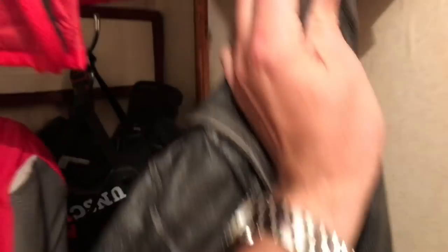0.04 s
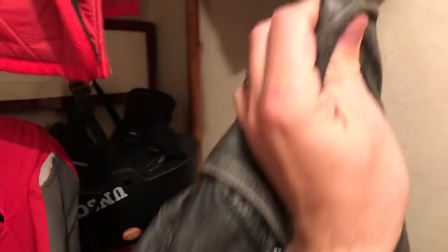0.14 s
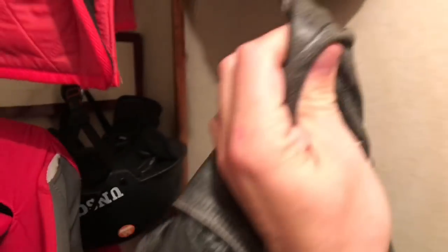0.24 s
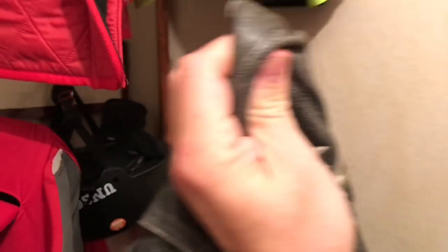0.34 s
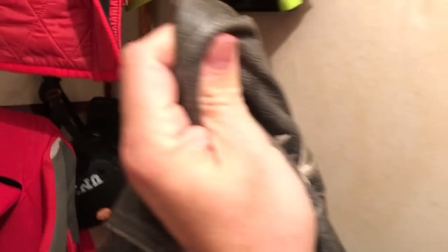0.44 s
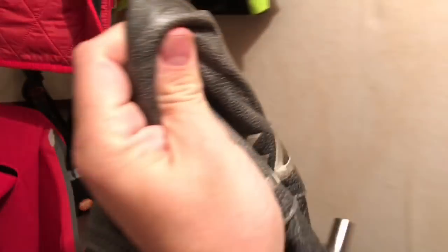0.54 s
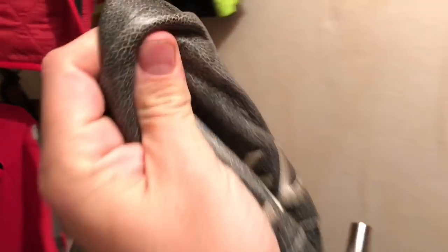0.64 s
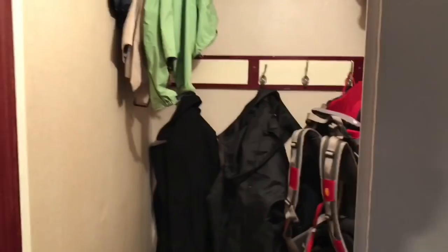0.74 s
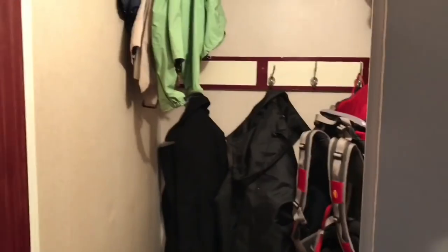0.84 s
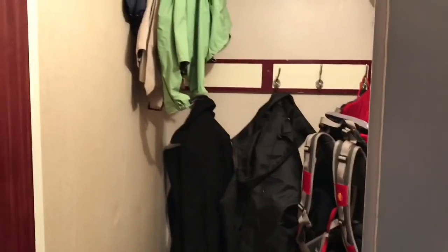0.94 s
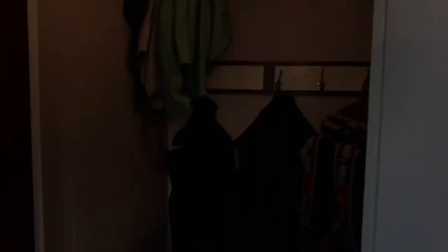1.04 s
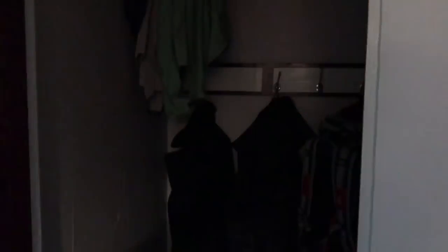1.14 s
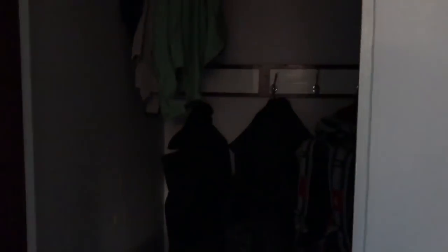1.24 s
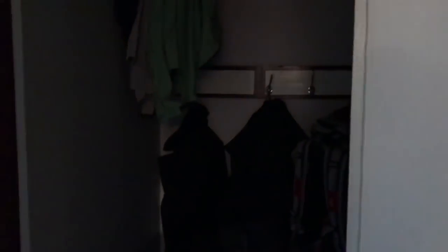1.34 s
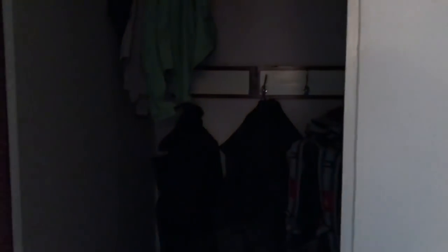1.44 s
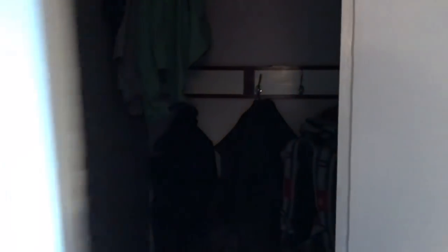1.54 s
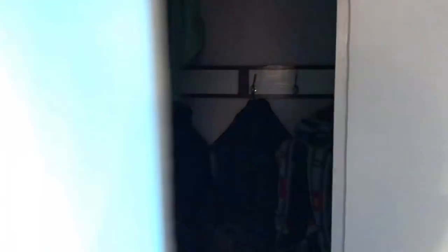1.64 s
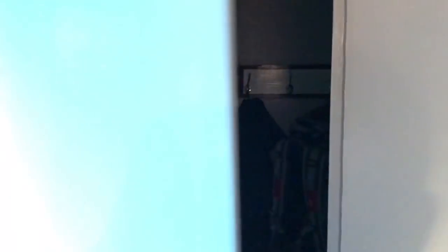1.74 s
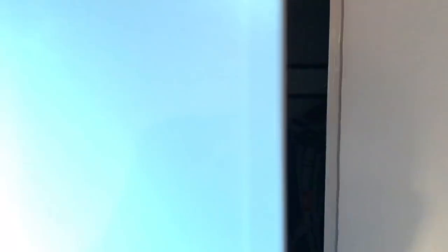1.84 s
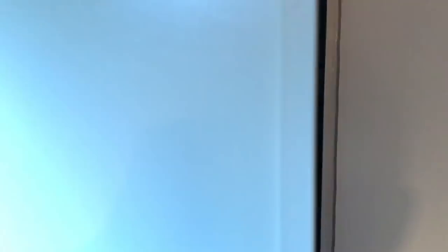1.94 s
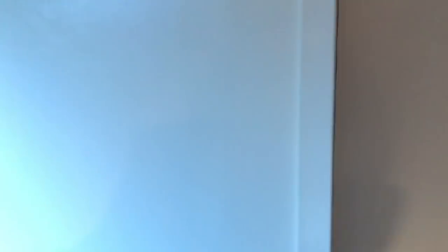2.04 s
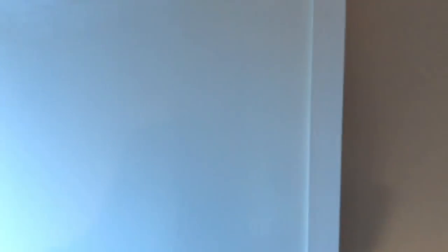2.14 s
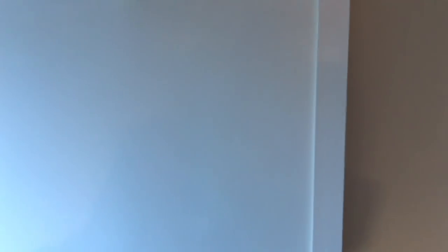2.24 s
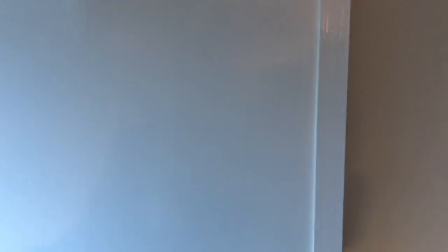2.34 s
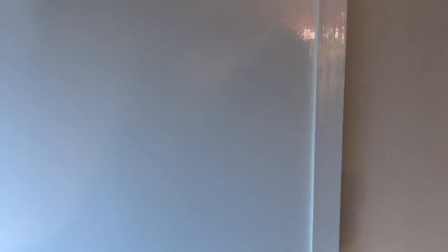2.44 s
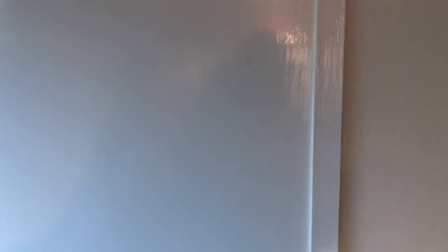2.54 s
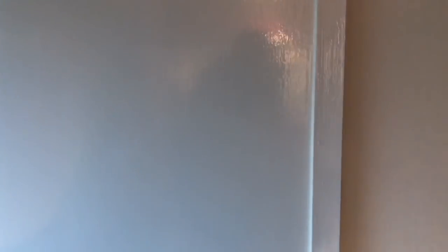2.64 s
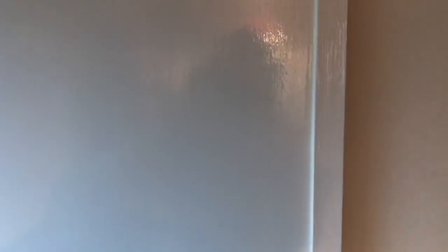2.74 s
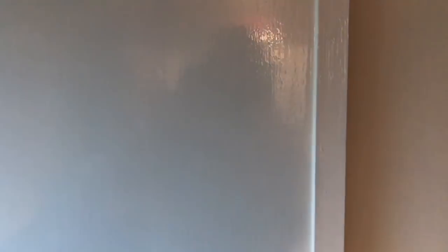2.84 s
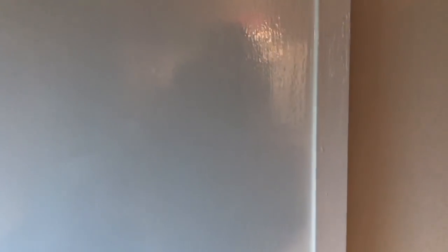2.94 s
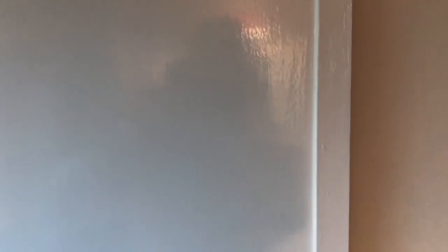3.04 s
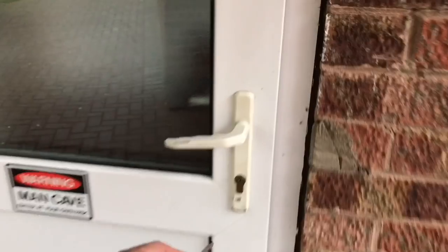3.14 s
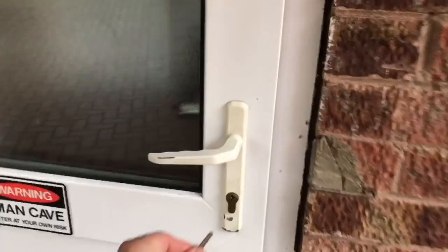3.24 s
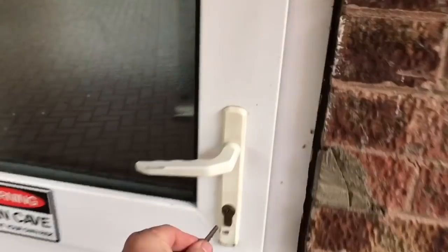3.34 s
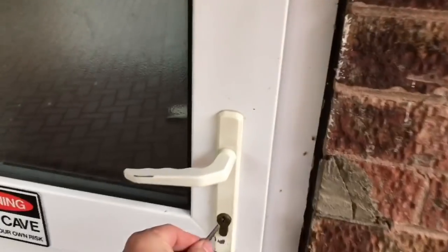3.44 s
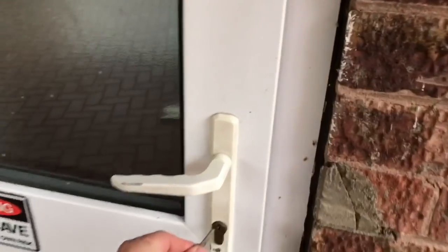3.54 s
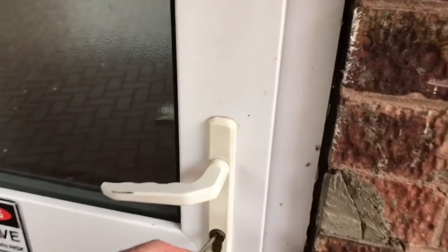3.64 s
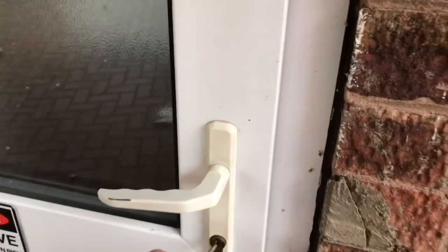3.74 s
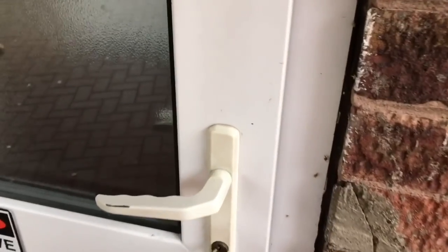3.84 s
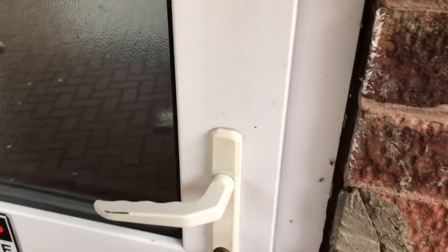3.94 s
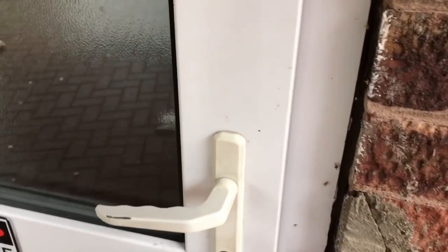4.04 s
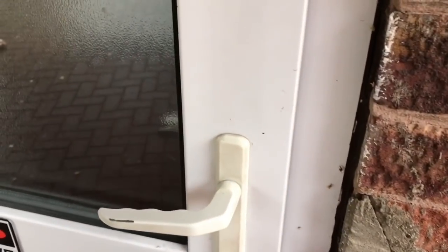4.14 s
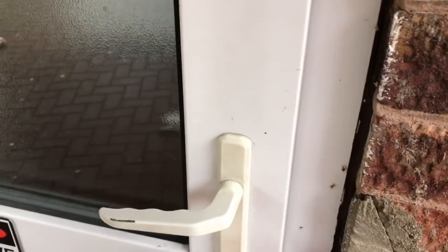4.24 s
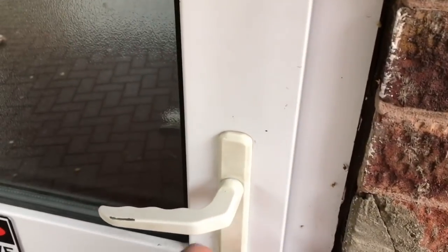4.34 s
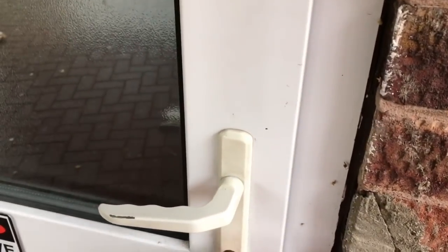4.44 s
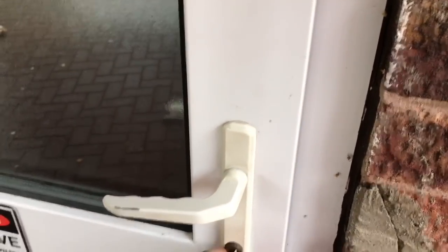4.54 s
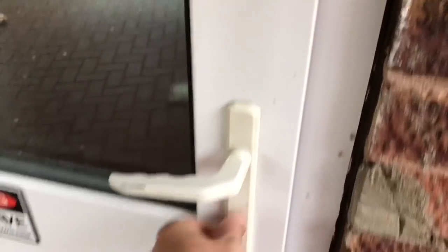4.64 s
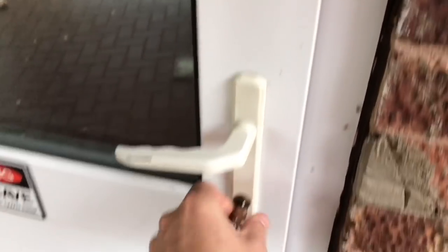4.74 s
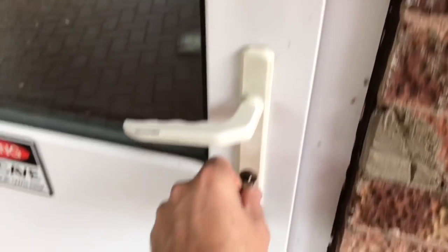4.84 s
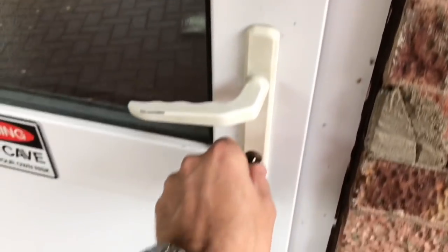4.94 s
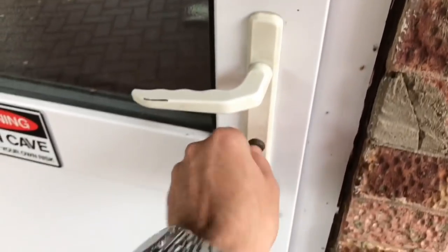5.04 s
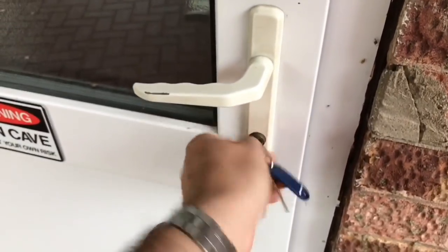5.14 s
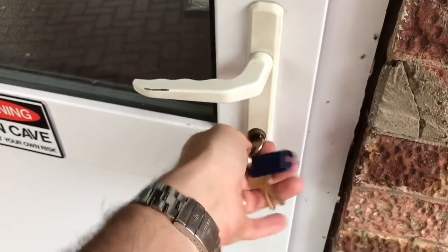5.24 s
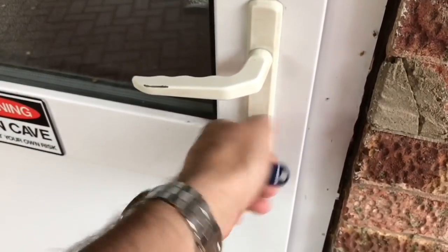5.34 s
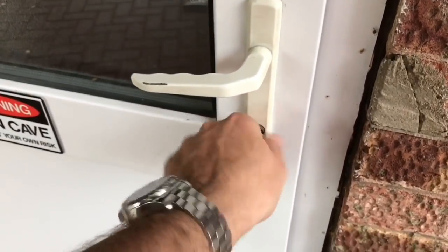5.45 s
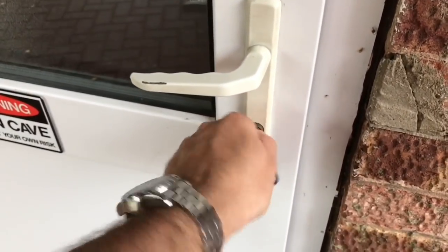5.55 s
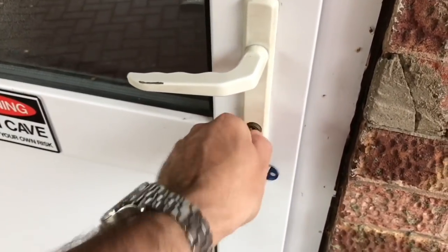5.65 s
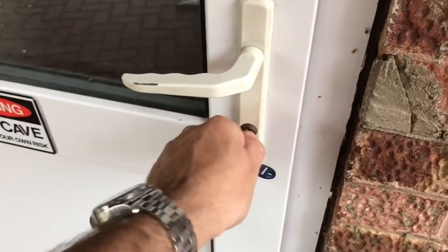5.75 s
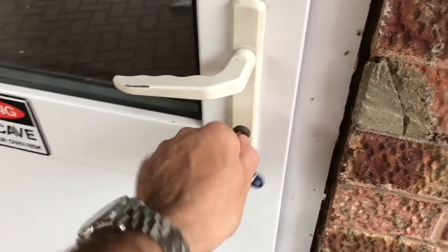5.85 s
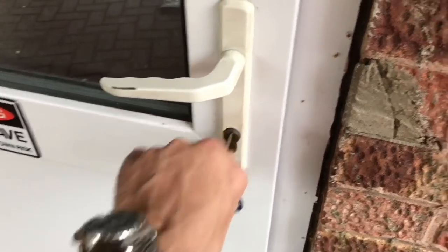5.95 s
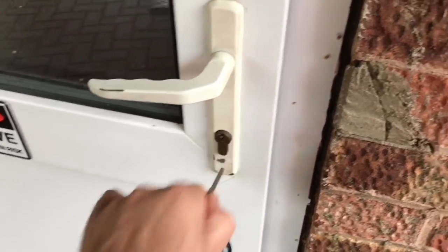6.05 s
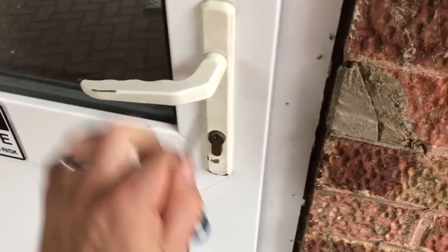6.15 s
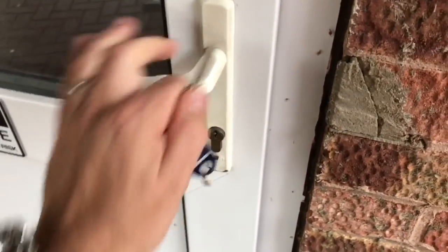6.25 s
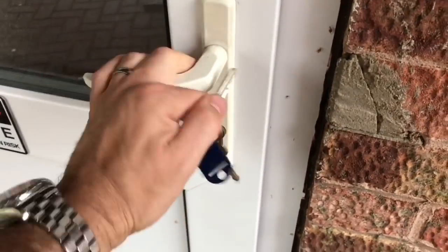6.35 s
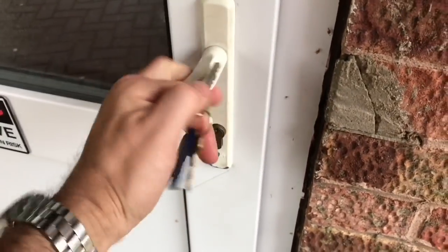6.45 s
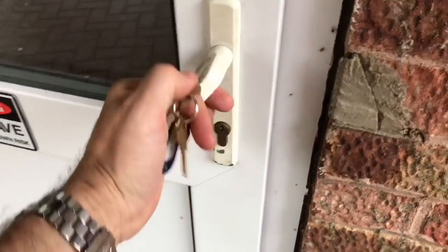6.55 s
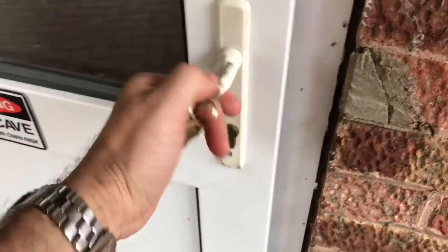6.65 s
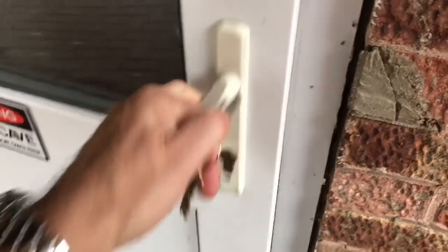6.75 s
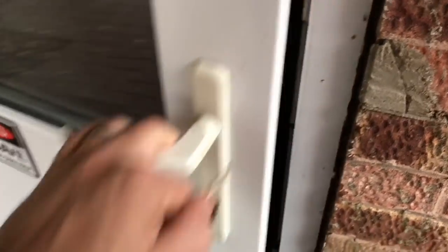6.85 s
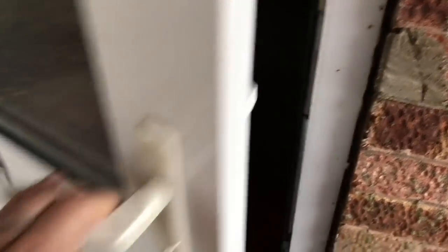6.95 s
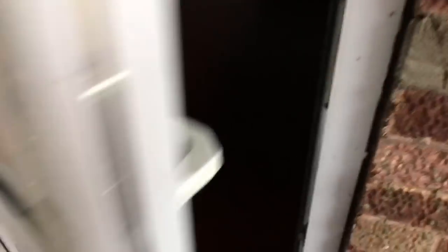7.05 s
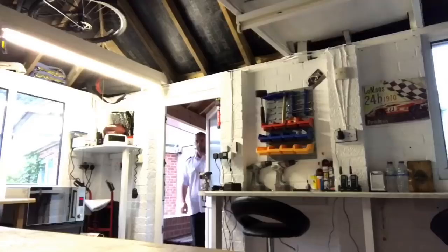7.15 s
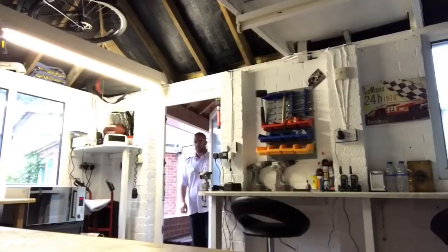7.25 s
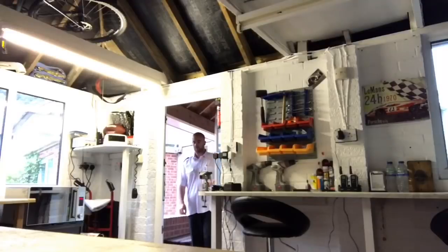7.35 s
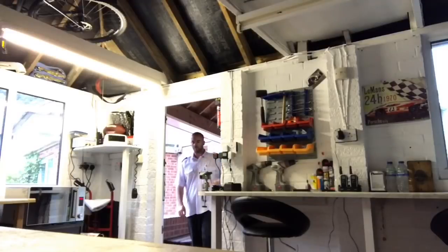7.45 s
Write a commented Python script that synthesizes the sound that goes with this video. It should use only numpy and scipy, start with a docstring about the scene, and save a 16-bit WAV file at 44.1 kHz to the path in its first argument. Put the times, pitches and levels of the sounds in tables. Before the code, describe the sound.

From 0 to 0.75 s, leather rubs unevenly close to the microphone, with small crinkles and dull handling bumps over quiet hall air. A faint sleeve rustle follows, and at 1.11 s a light switch snaps crisply, clacking again at 1.16. A soft scuff comes near 1.5. From 1.78 to 2.58 a wooden door creaks: ticking slips, a squeal dropping into a lower, rough groan. It slams at 2.58 with hard cracks, bouncing thuds and a short low boom; small woody ticks follow to 3.0. Louder outdoor air enters around 3.2. A shoe scrapes at 3.6, a key slides and clicks in at 4.1-4.4, and keys jingle at 4.6-4.7 and brightest at 5.35. Lock clicks and a dull bump come near 6.0, more jingling at 6.4, three quick handle knocks at 6.52, and a latch snap at 6.71. At 7.23 it cuts to quiet workshop air.

```python
"""A wooden door creaks shut and slams in a small hall: stick-slip pulses through leaf resonances, then cracks
and ringing low modes of door and hall. Before it a leather jacket rubs (friction noise) and a light switch snaps
(noise bursts). Outside a shoe scuffs and a key works the lock of a plastic door (ticks, struck modes) while the
bunch jangles (detuned brass modes). The handle goes down, the latch snaps free and a quiet room's air (shaped
noise) follows."""
import sys
import numpy as np
from scipy import signal
from scipy.fft import rfft, irfft, next_fast_len
from scipy.io import wavfile

SR = 44100
rng = np.random.default_rng(int(sys.argv[2]) if len(sys.argv) > 2 else 0)


def file_out(sig):
    """Save sig as 16-bit WAV at sys.argv[1]."""
    # one column per channel
    cols = np.atleast_2d(sig).T
    # limit, then scale
    lim = np.clip(cols, -1, 1)
    pcm = np.round(lim * 32767).astype(np.int16)
    wavfile.write(sys.argv[1], SR, pcm)


N = 330309
TIME = np.arange(N) / SR
CUTOFF_HZ = 15900


def from_db(db):
    """Decibels to gain."""
    return np.exp(np.asarray(db) * (np.log(10) / 20))


def rms_one(x):
    """Scale to unit power."""
    return x / np.sqrt(np.mean(x ** 2) + 1e-20)


def in_time(rows):
    """Each column of a curve at every sample."""
    s, *columns = np.transpose(rows)
    return [np.interp(TIME, s, column) for column in columns]


def at_hz(points, hz):
    """Read a table on a log-frequency axis."""
    f, value = np.transpose(points)
    return np.interp(np.log(np.maximum(hz, 1)), np.log(f), value)


def colour(x, spectrum):
    """Give a signal a spectrum; rms 1."""
    size = next_fast_len(len(x))
    hz = np.arange(size // 2 + 1) * SR / size
    shaped = rfft(x, size) * from_db(at_hz(spectrum, hz))
    return rms_one(irfft(shaped, size)[:len(x)])


def hump(hz, octaves):
    """Spectrum of one broad resonance, with extra loss from an octave above it."""
    f = np.geomspace(20, SR / 2, 60)
    offset = np.log2(f / hz)
    return np.c_[f, -14 * np.log10(1 + (offset / octaves) ** 2) - 5 * np.maximum(offset - 1, 0)]


def dying(t60, size=SR // 2):
    """Exponential decay from 1."""
    return from_db(-60 * TIME[:size] / max(t60, .002))


def gate(start, end, fade):
    """Open between two times, with soft edges."""
    return np.clip((TIME - start) / fade, 0, 1) * np.clip((end - TIME) / fade, 0, 1)


def add(out, s, sound):
    """Mix a sound in at a time."""
    i = max(round(s * SR), 0)
    out[i:i + len(sound)] += sound[:max(N - i, 0)]


def burst(spectrum, t60, size=SR // 4):
    """A blow on a body with many close modes: decaying coloured noise."""
    return colour(rng.standard_normal(size), spectrum) * dying(t60, size)


def banded_burst(spectrum, decay, size=SR // 2):
    """Like burst, but every octave dies at its own rate."""
    bins = rfft(colour(rng.standard_normal(size), spectrum))
    octave = np.log2(np.clip(np.arange(len(bins)) * SR / size, 64, 16384))
    out = np.zeros(size)
    for k in range(6, 15):
        band = irfft(bins * np.maximum(1 - abs(octave - k), 0), size)
        out += band * dying(at_hz(decay, 2 ** k), size)
    return out


def ring(clicks, hz, t60):
    """A unit click sets a two-pole resonator ringing as a sine of height 1."""
    r, w = from_db(-60 / (t60 * SR)), 2 * np.pi * hz / SR
    return signal.lfilter([0, np.sin(w)], [1, -2 * r * np.cos(w), r * r], clicks + 1e-18)


def friction(per_s, spread_db, size=N):
    """Tiny catches of uneven size between two rubbing surfaces."""
    sizes = from_db(spread_db * np.minimum(rng.exponential(1, size), 4))
    return rng.standard_normal(size) * sizes * (rng.random(size) < per_s / SR)


def slow_chance(rate_hz):
    """Random wander of spread 1, drawn at every 16th sample."""
    coarse = colour(rng.standard_normal(N // 16 + 2), [(16 * rate_hz, 0), (160 * rate_hz, -60)])
    return np.interp(np.arange(N) / 16, np.arange(len(coarse)), coarse)


def tick(spectrum, t60, size=SR // 8):
    """Metal on metal: a hard first contact, then ever smaller bounces."""
    bounces = friction(per_s=5000, spread_db=3.5, size=size) * dying(t60, size)
    bounces[1] += 2.2
    bounces *= np.sqrt(np.sum(dying(t60, size) ** 2) / np.sum(bounces ** 2))
    padded = np.r_[bounces, np.zeros(size)]
    return colour(padded, spectrum)[:size] * np.std(padded)


METAL_SPREAD_DB, METAL_DAMPING_SPREAD, METAL_ATTACK_S = 4, .3, .0005


def metal(hz, db, t60, size=SR // 4):
    """Struck modes, each with a strength and a damping of its own at every blow."""
    strength = from_db(db + rng.normal(0, METAL_SPREAD_DB, len(hz))) * rng.choice([-1, 1], len(hz))
    damped_t60 = t60 * rng.lognormal(0, METAL_DAMPING_SPREAD, len(hz))
    tails = np.array([dying(d, size) for d in damped_t60])
    modes = tails * np.sin(2 * np.pi * hz[:, None] * TIME[:size])
    build_up = 1 - np.exp(-TIME[:size] / METAL_ATTACK_S)
    return build_up * (strength @ modes)


# parts in turn, hall, hall, yard, workshop: (start [s], end [s], background level [dB])
PARTS = [(-.02, 0.76, -49), (.765, 3.6, -52), (3.194, 7.226, -39.5), (7.235, 8.5, -49.5)]
# air of each place: (frequency [Hz], density [dB per Hz])
HALL_AIR = [(26, -55), (45, 8), (200, -11), (552, -21), (12000, -42)]
YARD_AIR = [(22, -18.5), (80, 0), (180, -13), (320, -17), (1160, -16.5), (1940, -24), (3340, -25.5),
            (16000, -49.5)]
WORKSHOP_AIR = [(18, -26), (30, 4), (220, -19.5), (1460, -20.5), (6900, -40.5), (16000, -48)]
# wind and far traffic in the yard: (time [s], level [dB])
YARD_SWELL = [(4.3, -4.5), (5.8, -7.5), (6.8, -6.5), (7.2, -10)]


def backgrounds():
    """Steady air as coloured noise, faded in and out with each part; the yard's level swells."""
    swells = (1, 1, from_db(in_time(YARD_SWELL)[0]), 1)
    spectra = (HALL_AIR, HALL_AIR, YARD_AIR, WORKSHOP_AIR)
    out = np.zeros(N)
    for (start, end, db), swell, air in zip(PARTS, swells, spectra):
        out += from_db(db) * swell * gate(start, end, 0.024) * colour(rng.standard_normal(N), air)
    return out


# leather rubbing: (time [s], level [dB])
JACKET_RUB = [(0, -52), (.09, -47), (.2, -54), (.38, -48), (.52, -55.5), (.72, -52)]
# leather colour, also the sleeve's: (frequency [Hz], density [dB per Hz])
LEATHER = [(120, -34), (200, -21), (387, 2.5), (448, -10), (916, -7.5), (16000, -22.5)]
# buckling folds: (time [s], level [dB])
CRINKLES = [(.036, -43), (.232, -45), (.632, -40.5), (.665, -47)]
CRINKLE_T60_S = .1


def jacket():
    """Leather slides through the hand in fits and starts, and its folds buckle with short crinkles."""
    grip = from_db(2.0 * slow_chance(rate_hz=15))
    level = from_db(in_time(JACKET_RUB)[0]) * grip * gate(-0.024, 0.747, 0.032)
    out = level * colour(friction(per_s=5000, spread_db=2.5), LEATHER)
    for s, db in CRINKLES:
        folds = colour(friction(per_s=1700, spread_db=1.5, size=SR // 4), hump(hz=1840, octaves=1.8))
        add(out, s, from_db(db) * folds * dying(CRINKLE_T60_S, len(folds)))
    return out


# dull bumps of hands and feet: (time [s], level [dB], frequency [Hz])
BUMPS = [(.055, -33.5, 253), (.341, -36.5, 246), (.415, -28, 76), (.559, -30.5, 236), (0.661, -35, 242),
         (1.031, -31.5, 74), (1.04, -31.5, 157.5), (3.131, -28, 141), (4.388, -29.5, 65.6),
         (5.986, -23.5, 62)]
BUMP_CYCLES = 15   # swings per 60 dB of decay


def bumps():
    """A soft push swings a panel for a few cycles: a decaying sine plus narrow noise."""
    out, t = np.zeros(N), TIME[:SR // 2]
    for s, db, hz in BUMPS:
        t60 = BUMP_CYCLES / hz
        swing = np.sin(2 * np.pi * hz * t) * dying(t60)
        swing += 0.49 * burst(hump(hz, octaves=0.53), t60, size=len(t))
        add(out, s, from_db(db) * swing * (1 - np.exp(-t / 0.0029)))
    return out


def rub(t60, rise_share, hz, octaves, size=SR // 2):
    """Friction that swells and dies away; returns the time to its peak and the sound."""
    rise = rise_share * t60
    swell = np.linspace(0, 1, max(int(rise * SR), 2)) ** 0.61
    shape = np.r_[swell, dying(t60)][:size]
    return rise, shape * colour(friction(per_s=3000, spread_db=3.0, size=size), hump(hz, octaves))


# broad scrapes of sleeves, shoes and metal: (peak time [s], fall t60 [s], level [dB])
SCRAPES = [(.635, 0.16, -44.5), (3.142, .11, -43.5), (3.612, 0.17, -33), (3.675, .25, -34.5),
           (4.58, 0.097, -39), (6.577, 0.24, -40)]
SCRAPE_RISE_SHARE, SCRAPE_HZ, SCRAPE_OCTAVES = .18, 890, 2.8   # rise as a share of the fall
# rubs on one resonance of wall or floor: (peak time [s], fall t60 [s], level [dB], centre [Hz])
SCUFFS = [(0.429, 0.29, -47, 445), (1.04, 0.46, -50, 2040), (1.389, .8, -43, 230),
          (1.52, 0.34, -36.5, 1030), (3.62, .3, -42, 470)]
SCUFF_RISE_SHARE, SCUFF_OCTAVES = .045, 0.38


def scuffs():
    """Broad scrapes share one colour; narrow rubs each sound their own resonance."""
    out = np.zeros(N)
    for s, t60, db in SCRAPES:
        rise, sound = rub(t60, SCRAPE_RISE_SHARE, SCRAPE_HZ, SCRAPE_OCTAVES)
        add(out, s - rise, from_db(db) * sound)
    for s, t60, db, hz in SCUFFS:
        rise, sound = rub(t60, SCUFF_RISE_SHARE, hz, SCUFF_OCTAVES)
        add(out, s - rise, from_db(db) * sound)
    return out


SLEEVE_START_S, SLEEVE_END_S, SLEEVE_DB = 1.0, 1.68, -60


def sleeve():
    """A sleeve rustles faintly, as dense friction, as the arm reaches for the switch and the door."""
    rustle = colour(friction(per_s=9000, spread_db=1), LEATHER)
    return from_db(SLEEVE_DB) * gate(SLEEVE_START_S, SLEEVE_END_S, .1) * rustle


# woodwork ticks: (time [s], level [dB])
WOOD_TICKS = [(1.021, -47), (2.758, -36), (2.876, -42), (2.997, -33.5)]
WOOD_TICK_HZ, WOOD_TICK_T60_S = 2170, .08


def wood_ticks():
    """The woodwork gives with short knocks that ring on one note."""
    out, t = np.zeros(N), TIME[:SR // 4]
    note = np.sin(2 * np.pi * WOOD_TICK_HZ * t) * dying(WOOD_TICK_T60_S, len(t))
    for s, db in WOOD_TICKS:
        knock = burst(hump(WOOD_TICK_HZ, octaves=0.07), WOOD_TICK_T60_S / 2)
        add(out, s, from_db(db) * (note + knock))
    return out


# rocker snaps: (time [s], level [dB])
SWITCH_SNAPS = [(1.1119, -20.5), (1.1149, -23.5)]
# colour: (frequency [Hz], density [dB per Hz])
SWITCH_COLOUR = [(250, -45), (645, -1.5), (1300, -4.5), (2880, -14), (3290, -4.5), (4910, -9), (8500, -1),
                 (16000, -19.5)]
# decay: (frequency [Hz], t60 [s])
SWITCH_DECAY = [(500, 0.03), (15000, 0.13)]
SWITCH_CLACK_S, SWITCH_CLACK_DB = 1.159, -30   # the finger lets the rocker go


def light_switch():
    """The rocker snaps over, its contact lands, and it clacks once more on release."""
    out = np.zeros(N)
    for s, db in SWITCH_SNAPS:
        add(out, s, from_db(db) * banded_burst(SWITCH_COLOUR, SWITCH_DECAY))
    clack = burst(hump(hz=2300, octaves=0.37), t60=0.026)
    add(out, SWITCH_CLACK_S, from_db(SWITCH_CLACK_DB) * clack)
    return out


# resonances of the wooden leaf: (frequency [Hz], lift [dB])
LEAF = [(1510, 7.5), (1620, 7), (1815, 9), (1935, 5)]
LEAF_WIDTH_HZ = 55


def wood(x):
    """The door leaf lifts the partials that pass through its resonances."""
    out = x.copy()
    for hz, db in LEAF:
        out += (from_db(db) - 1) * signal.lfilter(*signal.iirpeak(hz, hz / LEAF_WIDTH_HZ, fs=SR), x)
    return out


# hinge motion: (time [s], mean slip rate [1/s], level [dB], roughness [0-1])
CREAK = [(1.775, 880, -47, .55), (1.855, 710, -37.5, .3), (1.885, 780, -40, .35), (1.91, 748, -41, 0.43),
         (1.925, 577, -28, .15), (1.96, 562, -28.5, .08), (1.995, 516, -29.5, .05),
         (2.025, 490, -29.5, .55), (2.08, 375, -30, .5), (2.17, 393, -27.5, .45), (2.245, 305, -28.5, .65),
         (2.319, 368, -33, .4), (2.37, 390, -26.5, .17), (2.44, 365, -35, .1), (2.49, 385, -30.5, .18),
         (2.54, 367, -31, .2), (2.57, 330, -26.5, .9)]
WALL_ECHO_S, WALL_ECHO_LOW_HZ = .008, 1200   # longest echo at the start of the creak; low edge of the echoes
SWING_S_PER_S = 0.001995   # largest change of an echo's delay per second


def swinging(x):
    """Near-wall reflections change length as the leaf swings, so upper partials flare and fade in turn."""
    upper = signal.sosfilt(signal.butter(2, WALL_ECHO_LOW_HZ, "high", fs=SR, output="sos"), x)
    paths = rng.uniform([0, -1], [WALL_ECHO_S, 1], (4, 2))
    swing_s = TIME - CREAK[0][0]
    echoes = [np.interp(TIME - lag - drift * SWING_S_PER_S * swing_s, TIME, upper) for lag, drift in paths]
    return x + sum(echoes) / np.sqrt(len(echoes))


# clean and rough colours: (frequency [Hz], density [dB per Hz])
CREAK_BODY = [(200, 0), (380, 11), (560, 0), (760, 0.5), (1150, -9.5), (1550, -6.5), (1880, 3),
              (2350, -0.5), (3500, -6.5), (5200, -15), (14000, -60)]
CREAK_RASP = [(200, -24.5), (380, -8.5), (775, -13), (1260, -14.5), (1850, -4), (2200, -6.5), (3650, -6),
              (8120, -20.5), (11400, -21.5), (16000, -33)]
LEAF_T60_S, LIMP_SHARE = 0.046, .35   # a rough hinge alternates strong and weak slips


def creak():
    """Stick-slip: one pulse a slip; uneven grip scatters slips in time and size and adds a crackle to each."""
    per_s, db, rough = in_time(CREAK)
    rough = np.clip(rough, 0, 1)
    waver = .012 * slow_chance(rate_hz=35) + .06 * rough * slow_chance(rate_hz=110)
    cycles = np.cumsum(per_s * (1 + waver)) / SR
    grip = from_db((1.2 + 1.5 * rough) * slow_chance(rate_hz=148))
    limp = 1 + LIMP_SHARE * np.sqrt(rough) * slow_chance(rate_hz=20) * np.cos(np.pi * cycles)
    slips = np.diff(cycles % 1, prepend=0) * grip * limp
    grit = friction(per_s=6000, spread_db=3.0) * np.exp(-3.0 * (cycles % 1)) * grip
    scatter = signal.fftconvolve(grit, rng.standard_normal(SR // 8) * dying(LEAF_T60_S, SR // 8))[:N]
    grit = rms_one(grit) + rms_one(scatter)   # the panels smear each crackle
    sounding = gate(CREAK[0][0], CREAK[-1][0] + 0.016, 0.0066)
    clean = colour(wood(swinging(slips)) * sounding, CREAK_BODY)
    rasp = colour(wood(grit) * sounding, CREAK_RASP)
    mix = np.sqrt(1 - rough) * clean + rough * rasp * from_db(3.5)
    return from_db(db) * np.std(sounding) * mix   # std offsets the silence counted by colour's rms


# lone hard slips of the hinge: (time [s], level [dB])
HINGE_SLIPS = [(1.7947, -28), (1.8192, -30), (1.8618, -22), (1.8705, -26.5), (1.879, -27.5), (1.916, -18.5),
               (1.9414, -19.5), (2.004, -24)]
SLIP_EDGE_DB = -25   # bright edge relative to its slip
# the latch rattles home: (time [s], level [dB])
LATCH_CLICKS = [(2.473, -28), (2.65, -24.5), (2.687, -30), (2.751, -31.5)]


def door_ticks():
    """Lone slips of the hinge and bright clicks of the latch, as short noise bursts."""
    out = np.zeros(N)
    for s, db in HINGE_SLIPS:
        add(out, s, from_db(db) * burst(hump(hz=2740, octaves=0.31), t60=0.014))
        add(out, s, from_db(db + SLIP_EDGE_DB) * burst(hump(hz=7900, octaves=1.8), t60=.012))
    for s, db in LATCH_CLICKS:
        add(out, s, from_db(db) * burst(hump(hz=4210, octaves=1.3), t60=0.0093))
    return out


# door meets latch, then frame: (time [s], crack level [dB], thud level [dB])
SLAM = [(2.577, -15, -22.5), (2.589, -12.5, -11.5)]
# bounces in the frame: (time [s], thud level [dB])
BOUNCES = [(2.609, -7.5), (2.6219, -6.5), (2.647, -13.5), (2.677, -17), (2.752, -28)]
BOUNCE_CRACK_DB = -33
# crack colour: (frequency [Hz], density [dB per Hz])
CRACK = [(120, -13), (200, -10.5), (1050, -12), (1870, -7), (2800, -10.5), (15000, -43)]
# crack decay: (frequency [Hz], t60 [s])
CRACK_DECAY = [(250, 0.12), (2000, 0.083), (12000, 0.085)]
# low modes of door and hall, set ringing by the slam: (frequency [Hz], level [dB], t60 [s])
SLAM_MODES = [(56.6, -23, 2.0), (69.8, -12, 0.71), (104, -10, 0.73), (162.8, -27, 0.72), (235, -22.5, 0.81),
              (269, -26, 0.42), (358, -21, 0.22), (455, -17, 0.19), (561, -17, 0.16)]
MODE_WANDER_DB, MODE_WANDER_HZ = 2.5, 12   # slow random wander of each mode's level: the boom dies unevenly
# rumble of frame and wall: (frequency [Hz], density [dB per Hz])
FRAME = [(35, -25), (80, 7.5), (140, -6.5), (270, -0.5), (450, -20), (900, -26.5), (3000, -52)]
FRAME_DB, FRAME_T60_S = -23, 0.92


def slam():
    """Wood cracks; each bounce pushes air and rings low modes of door and hall anew; returns cracks and thud."""
    cracks, blows, rumble = np.zeros(N), np.zeros(N), np.zeros(N)
    bounces = [(s, BOUNCE_CRACK_DB, db) for s, db in BOUNCES]
    for s, crack_db, thud_db in [*SLAM, *bounces]:
        add(cracks, s, from_db(crack_db) * banded_burst(CRACK, CRACK_DECAY))
        add(blows, s, from_db([thud_db]))
        add(rumble, s, from_db(thud_db + FRAME_DB) * burst(FRAME, FRAME_T60_S, size=SR))
    boom = np.zeros(N)
    for hz, db, t60 in SLAM_MODES:
        struck = blows * from_db(db + rng.normal(0, 1.6, N))   # each blow favours other modes
        boom += ring(struck, hz, t60) * from_db(MODE_WANDER_DB * slow_chance(MODE_WANDER_HZ))
    contact = np.hanning(int(0.0015 * SR))
    boom = signal.fftconvolve(boom, contact / contact.sum())[:N]
    push = signal.fftconvolve(blows, np.hanning(int(0.0045 * SR)))[:N]
    # the push of air keeps only its bass above about 70 Hz
    push = signal.sosfilt(signal.butter(2, 70, "high", fs=SR, output="sos"), push)
    return cracks, rumble - from_db(-1.0) * boom - from_db(3.5) * push


# contacts of key and bolt: (time [s], level [dB], hardness [dB]); hard favours pins, soft the panel
LOCK = [(4.141, -36, -3), (4.386, -29, 8.5), (5.12, -41.5, 0.5), (5.156, -26.5, 5), (5.456, -42.5, 6.5),
        (5.562, -35.5, 0.5), (5.978, -32.5, 0), (6.044, -48.5, 12), (6.066, -44, 8), (6.074, -35.5, 2.5),
        (6.398, -40, -11.5), (6.587, -39, 4), (6.846, -36, -1.5)]
# key slides in and out over the pins: (start [s], end [s], level [dB])
KEY_SLIDES = [(4.298, 4.384, -42), (6, 6.07, -44)]
PIN_GAP_S, PIN_SPREAD_DB, PIN_CYLINDER_DB = .012, 3.5, -12.5   # one tick per tooth; faint cylinder answer
# the handle drags the bolts back in three even knocks
HANDLE_S, HANDLE_STEP_S = 6.523, .0245
HANDLE_PANEL_DB, HANDLE_CYLINDER_DB, HANDLE_PIN_DB = -31, -32, -43


def lock_contacts():
    """Key, bolt and handle contacts as rows of (time [s], panel [dB], cylinder [dB], pin [dB])."""
    rows = [(s, db - hard_db, db, db + hard_db) for s, db, hard_db in LOCK]
    for start, end, slide_db in KEY_SLIDES:
        for s in np.arange(start, end, PIN_GAP_S):
            db = slide_db + rng.normal(0, PIN_SPREAD_DB)
            rows.append((s + PIN_GAP_S * rng.uniform(-.5, .5), -np.inf, db + PIN_CYLINDER_DB, db))
    for k in range(3):
        rows.append((HANDLE_S + k * HANDLE_STEP_S, HANDLE_PANEL_DB, HANDLE_CYLINDER_DB, HANDLE_PIN_DB))
    return rows


# colours of door panel, lock cylinder and pins: (frequency [Hz], density [dB per Hz])
PANEL = [(120, 9.5), (500, -1), (1000, 4), (1700, 1), (2800, -11), (5000, -18.5)]
CYLINDER = [(1500, -25.5), (3000, 4.5), (7000, 7.5), (10000, -40)]
PINS = [(5000, -31), (9000, 2), (16000, 3.5)]
# steel plate of the lock: (frequency [Hz], level [dB])
PLATE_MODES = [(2930, -7), (5766, -13), (6525, -10)]
PLATE_T60_S = .04   # typical; varies per blow


def lock():
    """Each contact ticks in the pins, rings in the cylinder and steel plate, and knocks on the hollow door."""
    out = np.zeros(N)
    hz, mode_db = np.transpose(PLATE_MODES)
    for s, panel_db, cylinder_db, pin_db in lock_contacts():
        add(out, s, from_db(panel_db) * burst(PANEL, t60=0.1))
        add(out, s, from_db(cylinder_db - 2) * tick(CYLINDER, t60=0.028))
        add(out, s, from_db(pin_db) * tick(PINS, t60=0.023))
        add(out, s, metal(hz, cylinder_db + mode_db, PLATE_T60_S))
    return out


DRAG_S, DRAG_DB = 0.032, -15


def lock_drag():
    """Metal grates on metal just before and after each contact: sparse friction in the pins' colour."""
    motion = np.zeros(N)
    for s, _, _, pin_db in lock_contacts():
        add(motion, s - DRAG_S / 4, from_db(pin_db) * np.hanning(int(DRAG_S * SR)))
    return from_db(DRAG_DB) * motion * colour(friction(per_s=920, spread_db=7.0), PINS)


# keys knock together: (time [s], ring level [dB], tick level [dB], tilt [dB per octave])
KEY_KNOCKS = [(4.578, -44, -33, 3), (4.589, -32.5, -45, 16), (4.637, -49, -34, 0), (4.697, -34, -36, -3),
              (4.7115, -26, -27, -5), (4.718, -27.5, -30, -7), (5.277, -34.5, -42, -8),
              (5.298, -30.5, -40.5, -4.5), (5.352, -19, -22, 7), (5.3645, -19.5, -28, -2.5),
              (6.235, -46, -37, 4), (6.389, -35, -44, -10), (6.419, -26.5, -28.5, 1), (7.205, -55, -41, -7)]
# runs of light touches: (start [s], end [s], ring level [dB], tick level [dB], tilt [dB per octave])
KEY_GRAZES = [(4.562, 4.73, -54, -47.5, 3), (5.304, 5.34, -35, -53, 15), (6.397, 6.414, -43, -48, -3),
              (6.422, 6.434, -35, -33, 6)]
TOUCH_GAP_S, TOUCH_SPREAD_DB, TOUCH_TILT_DB_PER_OCTAVE = 0.0058, 3.5, 6


def key_knocks():
    """Clear knocks and light touches as rows of (time [s], ring [dB], tick [dB], tilt [dB per octave])."""
    rows = list(KEY_KNOCKS)
    for start, end, ring_db, tick_db, tilt_db in KEY_GRAZES:
        for s in np.arange(start, end, TOUCH_GAP_S):
            spreads = [TOUCH_GAP_S / 3, TOUCH_SPREAD_DB, TOUCH_TILT_DB_PER_OCTAVE]
            late, db, lean_db = rng.normal(0, spreads)
            rows.append((s + late, ring_db + db, tick_db + db, tilt_db + lean_db))
    return rows


# brass keys: (frequency [Hz], level [dB], typical t60 [s])
KEY_MODES = [(6950, -16, 0.063), (7730, -15, 0.1), (8300, -14.5, .11), (8335, -14.5, 0.12),
             (10840, -9.5, 0.069), (11640, -7, .05), (11700, -3.5, 0.078)]
KEY_DETUNE_SHARE = .0015   # the fingers detune each knock
# lowest note, when the bunch swings free: (time [s], level [dB])
LOW_PINGS = [(5.298, -45.5), (5.353, -49)]
LOW_PING_HZ, LOW_PING_T60_S = 2540, .16
CLINK_LOW_HZ, CLINK_DB, CLINK_T60_S = 7500, -7, .03   # split ring and key tips


def keys():
    """Every knock ticks and sets the keys ringing, and the split ring clinks at a new pitch each time."""
    out, t = np.zeros(N), TIME[:SR // 4]
    hz, mode_db, t60 = np.transpose(KEY_MODES)
    for s, db in LOW_PINGS:
        add(out, s, from_db(db) * np.sin(2 * np.pi * LOW_PING_HZ * t) * dying(LOW_PING_T60_S, len(t)))
    for s, ring_db, tick_db, tilt_db in key_knocks():
        pitch = hz * (1 + rng.normal(0, KEY_DETUNE_SHARE, len(hz)))
        tilt = tilt_db * np.log2(hz / hz.mean())
        add(out, s, metal(pitch, ring_db + mode_db + tilt, t60))
        clink_hz = rng.uniform(CLINK_LOW_HZ, CUTOFF_HZ, size=4)
        add(out, s, metal(clink_hz, tick_db + CLINK_DB, CLINK_T60_S))
        contact = tick(PINS, t60=0.013) + from_db(-8.5) * tick(CYLINDER, t60=0.026)
        add(out, s, from_db(tick_db - 2) * contact)
    return out


LATCH_S, LATCH_DB, LATCH_REBOUND_S, LATCH_LOSS_DB = 6.709, -24.5, 0.014, 4.5


def latch():
    """The steel latch of the plastic door snaps free and rebounds once: a narrow burst and a tick each time."""
    out = np.zeros(N)
    for s, db in [(LATCH_S, LATCH_DB), (LATCH_S + LATCH_REBOUND_S, LATCH_DB - LATCH_LOSS_DB)]:
        snap = burst(hump(hz=5200, octaves=0.2), t60=0.012, size=SR // 8)
        add(out, s, from_db(db) * (snap + from_db(-5.5) * tick(PINS, t60=0.021)))
    return out


def reverberation(x, decay, delay):
    """Diffuse reflections as a decaying noise tail of unit energy, starting after a delay."""
    tail = banded_burst([(100, 5.4), (4000, 2.6), (16000, 5.5)], decay)
    tail *= np.clip(TIME[:SR // 2] / delay - 1, 0, 1)
    return signal.fftconvolve(x, tail / np.sqrt(np.sum(tail ** 2)))[:N]


# hall decay: (frequency [Hz], t60 [s])
HALL_DECAY = [(100, 0.47), (1000, 0.39), (4000, 0.3), (14000, 0.13)]


def scene():
    """The hall rings; outside only the brick porch answers, until the yard part ends."""
    cracks, thud = slam()
    switch = light_switch()
    door = creak() + door_ticks() + wood_ticks() + cracks
    outdoors = lock() + lock_drag() + latch() + keys()
    hall_send = door + from_db(-5) * switch   # the switch is close by, so drier
    hall = from_db(-7.5) * reverberation(hall_send, HALL_DECAY, delay=0.0044)
    porch = from_db(-13.0) * reverberation(outdoors, [(300, 0.68), (12000, 0.2)], delay=0.0045)
    yard = (outdoors + porch) * gate(*PARTS[2][:2], 0.019)
    handling = jacket() + sleeve() + scuffs() + bumps()
    return (switch + door + thud + hall + yard + handling + backgrounds())[None]


def record(dry):
    """The microphone drops the deepest bass and the top is cut."""
    thin = signal.sosfilt(signal.butter(2, 28, "high", fs=SR, output="sos"), dry)
    return signal.sosfilt(signal.ellip(10, .2, 80, CUTOFF_HZ, fs=SR, output="sos"), thin)


dry = scene()
out = record(dry)
file_out(out)
```